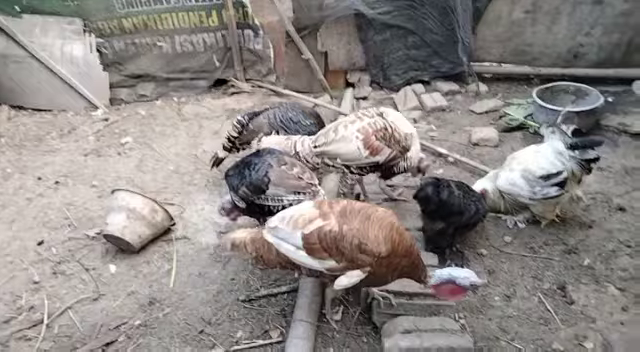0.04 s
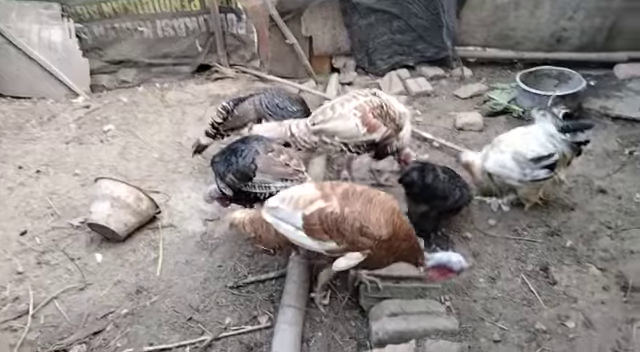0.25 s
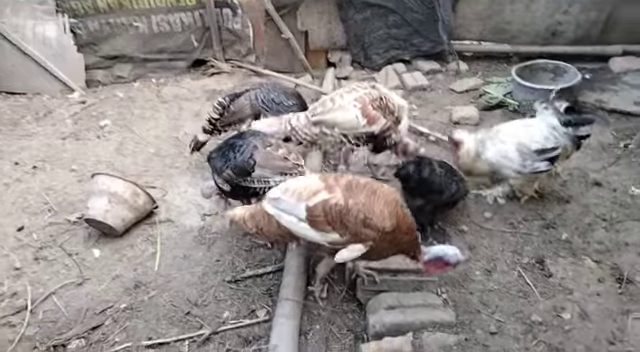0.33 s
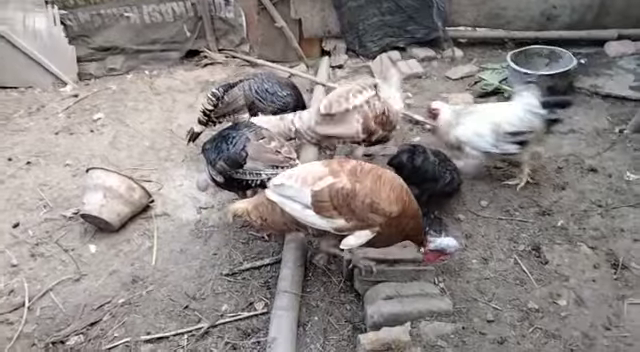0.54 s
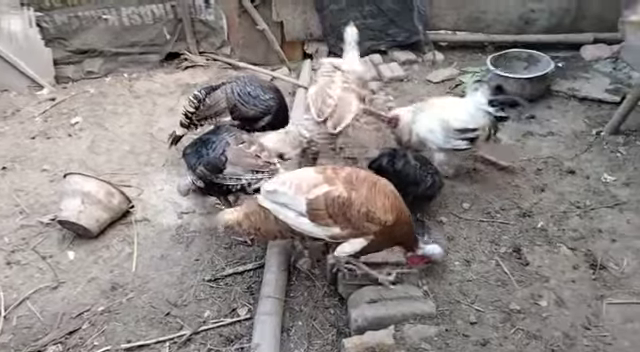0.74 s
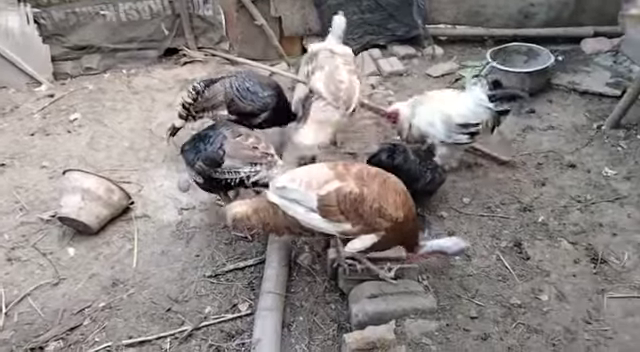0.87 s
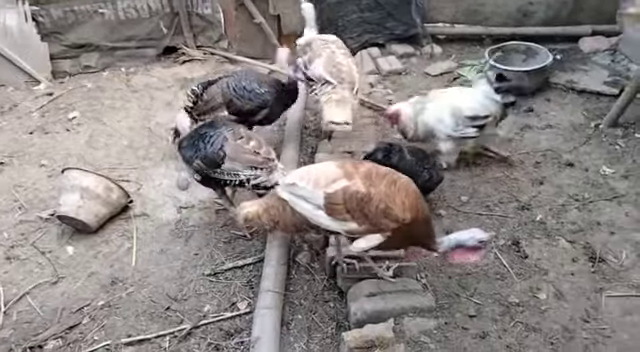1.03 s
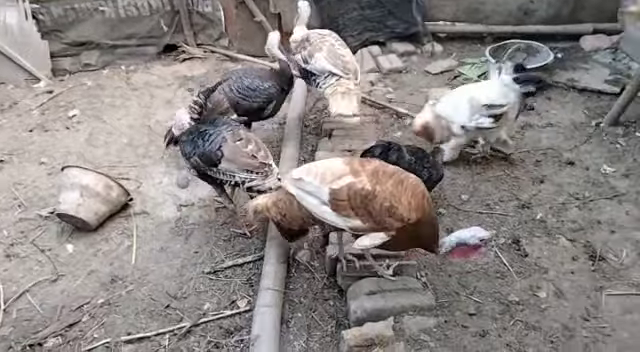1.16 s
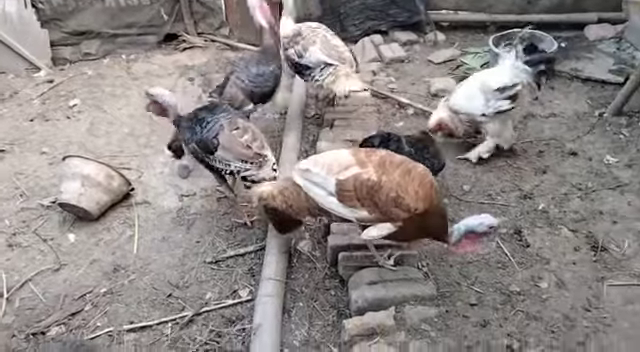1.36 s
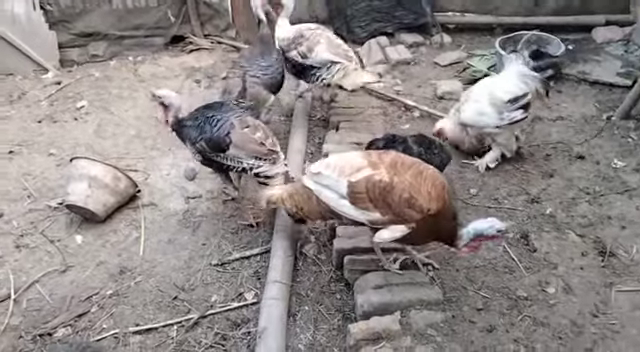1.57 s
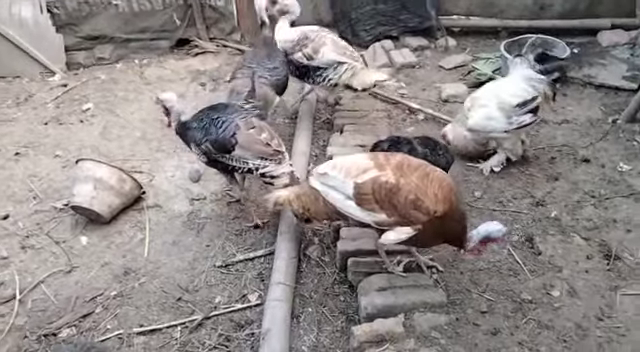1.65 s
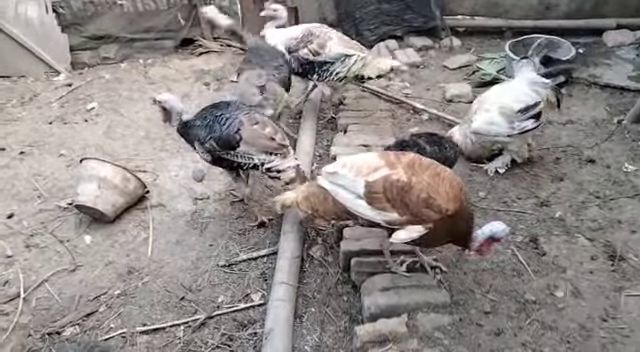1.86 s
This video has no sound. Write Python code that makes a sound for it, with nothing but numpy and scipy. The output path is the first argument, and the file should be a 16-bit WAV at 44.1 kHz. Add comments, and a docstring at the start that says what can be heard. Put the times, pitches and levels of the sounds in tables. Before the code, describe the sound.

Turkeys give a run of short, high yelps that mostly fall and crack, with one hoarse squawk overlapping the start. Light pecks, foot scuffs and soft hen clucks sit underneath, in a small, slightly echoing yard.

```python
"""Outdoor air and a low rumble fade in with three faint ticks; then turkeys call in a small walled yard.
One hoarse squawk, a stack of harmonics under a moving beak resonance, overlaps the first of a run of
yelps. Most yelps fall and crack at the end as the vocal membrane jitters and doubles its period.
Beaks peck, feet scuff dirt and knock on brick, and a hen clucks softly over a brief low drone.
Walls and sheds echo the birds."""
import sys
import numpy as np
from scipy import signal
from scipy.fft import rfft, irfft, next_fast_len
from scipy.io import wavfile
from scipy.ndimage import uniform_filter1d, map_coordinates

SR = 44100
rng = np.random.default_rng(int(sys.argv[2]) if len(sys.argv) > 2 else 0)


def transcribe(u):
    """Save the signal u as a 16-bit wav file named by the first command-line argument.

    u: samples, shape (n,) or (channels, n), limited to [-1, 1]; the rate is SR.
    q: integer samples, one column per channel.
    """
    v = np.clip(np.atleast_2d(u).T, -1, 1)
    q = np.round(v * 32767).astype(np.int16)
    wavfile.write(sys.argv[1], SR, q)


N = 83790


def amp(db):
    return 10 ** (np.asarray(db) / 20)


def unit_rms(x):
    return x / np.sqrt(np.mean(x ** 2) + 1e-20)


def clock():
    return np.arange(N) / SR


def along(points, hz):
    """Interpolate (f/Hz, value) points on a log frequency axis."""
    freqs, values = np.transpose(points)
    return np.interp(np.log(hz + 1), np.log(freqs + 1), values)


def curves(rows):
    """One per-sample curve for each column after t/s."""
    times, *columns = np.transpose(rows)
    return [np.interp(clock(), times, column) for column in columns]


def wobble(rate_hz):
    """Smooth random curve, rate_hz knots a second."""
    return map_coordinates(rng.standard_normal(N // 4), [clock() * rate_hz], mode="wrap")


def filtered(x, response):
    """Multiply the spectrum by response(hz)."""
    size = next_fast_len(N + SR // 2)
    return irfft(rfft(x, size) * response(np.fft.rfftfreq(size, 1 / SR)), size)[:N]


def noise(colour):
    """Coloured noise, rms 1."""
    return unit_rms(filtered(rng.standard_normal(N), lambda hz: amp(along(colour, hz))))


def gate(start_s, end_s, edge_s=0.0064):
    """Flat window with Gaussian edges."""
    outside_s = np.maximum(0, np.maximum(start_s - clock(), clock() - end_s))
    return np.exp(-(outside_s / edge_s) ** 2)


def arch(start_s, length_s):
    """Half-sine window."""
    return np.abs(np.sin(np.pi * np.clip((clock() - start_s) / length_s, 0, 1)))


def membrane_phase(hz, rough):
    """Phase of a vocal membrane; pitch jitter grows with roughness."""
    jitter = (0.008 + 0.037 * rough) * wobble(499.7)
    return 2 * np.pi * np.cumsum(hz * (1 + jitter)) / SR


def partial(phase, rough, rasp_hz=443):
    """Sine with a share of its power smeared into narrowband rasp."""
    share = np.clip(rough, 0, 1) ** 2
    rasp = wobble(rasp_hz) * np.sin(phase) + wobble(rasp_hz) * np.cos(phase)
    return np.sqrt(2 * (1 - share)) * np.sin(phase) + np.sqrt(share) * rasp


def bursts(rows, colour, t60_s, attack_s):
    """One decaying noise burst per (t/s, level/dB) row."""
    envelope = np.zeros(N)
    for start_s, db in rows:
        age_s = np.maximum(clock() - start_s, 0)
        envelope += amp(db - 60 * age_s / t60_s) * (1 - np.exp(-age_s / attack_s))
    return noise(colour) * envelope


# Air and rumble spectra: f/Hz, relative level/dB
AIR_COLOUR = [(130, 8), (220, 4), (330, 0.5), (460, 4), (650, -10.5), (1100, -12.5), (1600, -1),
              (2400, -19.5), (4000, -20), (6500, -25.5), (9200, -11.5), (11500, -21.5), (15000, -17.5)]
RUMBLE_COLOUR = [(20, -17), (45, 13.5), (70, 12.5), (95, 13), (130, -43), (250, -84)]


def air():
    """Outdoor air: broad noise with a slight flutter."""
    return noise(AIR_COLOUR) * amp(-62.5 + 0.75 * wobble(14))


def rumble(rise_s=0.31):
    """Low noise that swells in and stays."""
    rise = np.minimum(clock() / rise_s, 1) ** 3
    return noise(RUMBLE_COLOUR) * amp(-58 + wobble(5.3)) * rise


# Ticks: t/s, level/dB
TICK_HITS = [(.169, -60), (.229, -60), (.269, -55)]
# Tick spectrum: f/Hz, relative level/dB
TICK_SPECTRUM = [(100, -24), (300, 1), (1000, -8), (4000, -17.5), (15000, -28)]


def ticks():
    """Faint, dull ticks."""
    return bursts(TICK_HITS, TICK_SPECTRUM, t60_s=0.017, attack_s=0.0001)


# One contour per yelp: t/s, f/Hz, level/dB, half-pitch lines/dB, overtones/dB, roughness
YELP_CONTOURS = [
    [(.275, 1184, -60.5, -18, -8, 0.22), (.29, 1411, -48.5, -14, -5, 0.1),
     (.312, 1431, -43.5, -20, 8, 0.11), (.329, 1504, -36.5, -27, 2, 0.18)],
    [(.475, 1800, -48, 13.5, 7, 0.51), (.497, 1961, -37, 4.5, 1.5, 0.16), (.522, 2047, -38.5, 9.5, 5, 0.27),
     (.533, 1947, -38.5, 12, 3, 0.51), (.539, 1539, -35.5, 10.5, -2.5, 0.43),
     (.565, 1365, -46, 3, -4, 0.56)],
    [(.698, 1843, -58.5, -27, 2, 0.08), (.711, 2082, -50.5, 8, 6, 0.22), (.724, 1848, -43, 7, -3.5, 0.13),
     (.742, 1893, -41.5, 6.5, 3, .25), (.751, 1970, -39, 1, -1.5, 0.37), (.764, 1803, -45, -8, 8.5, 0.22),
     (.785, 1635, -42, -27, 5, 0.5), (.812, 1546, -50.5, 2.5, 6, 0.66)],
    [(.932, 1724, -58.5, 15, -2.5, 0.39), (.948, 1900, -37.5, -29, 0.5, 0.45),
     (.961, 1627, -32.5, -6, -6, .12), (.987, 1580, -33.5, -12.5, -4, 0.11),
     (.998, 1467, -34.5, 5, -6, 0.14), (1.01, 1471, -61.5, 13.5, 4.5, 0.46),
     (1.045, 1248, -48.5, 10.5, -6.5, 1.05)],
    [(1.224, 1906, -58, -21, -28, 0.19), (1.243, 1878, -43, -28, -5.5, 0.34),
     (1.26, 1677, -41.5, -16, -4, 0.02), (1.274, 1628, -52, -16, 11.5, 0.11),
     (1.286, 1770, -45.5, -27, -1.5, 0.3), (1.308, 1736, -39.5, -9, 0, 0.17),
     (1.326, 1709, -40, -22, -1, 0.14), (1.346, 1513, -44, -2, 5, 0.66), (1.372, 1484, -52.5, 14, 0, 0.83)],
    [(1.364, 948, -49.5, -10, -11, 0.77), (1.385, 698, -57, -16, 12, 0.8)],
    [(1.541, 1664, -57.5, -10, 10, 0.28), (1.552, 1676, -45.5, 0, 4, 0.25), (1.572, 1638, -40, 3, 0, 0.11),
     (1.594, 1717, -34.5, -10.5, -2.5, 0.11), (1.617, 1650, -35, 2, 4, 0.25),
     (1.631, 1500, -35.5, -31, 1.5, 0.44), (1.644, 1326, -41, 14, -5.5, 0.28),
     (1.66, 1126, -55, -11, -18, 1.2), (1.68, 1054, -44, -18, -34, 0.1), (1.705, 985, -68, -15, -16, 0.5)],
    [(1.884, 1450, -91, -13, -11, 0.07), (1.895, 1639, -49, 18, -12.5, 0.31),
     (1.91, 1790, -34, -15, -16, 0.26)],
]
# Throat response: f/Hz, gain/dB
YELP_FORMANTS = [(500, -28), (830, -24.5), (1100, -23), (2520, -21), (3000, -28), (3600, -17.5),
                 (4300, -28), (5050, -22.5), (6000, -28.5), (7100, -23), (8200, -27.5), (9300, -21),
                 (10800, -40.5), (15000, -47)]
CALL_TRIM_DB, LINE_SWING_DB = -1.5, 3


def yelp(contour):
    """Whistle with blurred overtones and breath; period doubling adds lines halfway between them."""
    hz, db, doubling_db, overtone_db, rough = curves(contour)
    phase = membrane_phase(hz, rough)
    breath = amp(-11) * rough * noise(YELP_FORMANTS) * (1 + np.cos(phase / 2))
    lines = np.zeros(N)
    for k in range(1, 19):
        if k != 2:  # k = 2 is the whistle
            line_db = along(YELP_FORMANTS, k * hz / 2) + doubling_db * (k % 2)
            line_db += LINE_SWING_DB * wobble(44.69)
            smear = 0.1 + 0.04 * k + 1.6 * rough
            lines += amp(line_db) * partial(k * phase / 2, smear)
    voice = partial(phase, rough) + amp(overtone_db) * (lines + breath)
    return voice * amp(CALL_TRIM_DB + db) * gate(contour[0][0], contour[-1][0])


# Squawk: t/s, f/Hz, level/dB, roughness
SQUAWK_CONTOUR = [(0.317, 711, -40, .15), (0.321, 713.4, -42, 0.28), (0.337, 683, -41.5, 0.46),
                  (.352, 685.5, -37.5, 0.17), (0.374, 701.8, -40.5, 0.13), (.39, 692.6, -39, 0.65),
                  (.407, 657.4, -35, 0), (.417, 712.7, -38.5, 0.47), (.446, 655, -37, 0.53),
                  (.478, 632.4, -45.5, 0.72), (.492, 629, -48, 0.35)]
# Throat response: f/Hz, gain/dB
SQUAWK_FORMANTS = [(300, -52), (670, -3), (1000, -52), (1400, 5), (2050, 3.5), (2750, -4), (3350, -6.5),
                   (3800, -15.5), (4800, -18), (6200, -13), (7600, -16), (9400, -7.5), (11000, -19.5),
                   (15000, -25)]
# Beak resonance: t/s, f/Hz
BEAK_RESONANCE = [(.32, 2220), (.345, 2650), (.407, 2630), (.45, 2310), (.48, 1870)]


def squawk(beak_gain_db=13.5, beak_width_hz=540):
    """Low register: hoarse harmonics under the moving beak resonance, with pulsing breath."""
    hz, db, rough = curves(SQUAWK_CONTOUR)
    beak_hz, = curves(BEAK_RESONANCE)
    phase = membrane_phase(hz, rough)
    voice = np.zeros(N)
    for k in range(1, 22):
        beak_db = beak_gain_db * np.exp(-((k * hz - beak_hz) / beak_width_hz) ** 2)
        line_db = along(SQUAWK_FORMANTS, k * hz) + beak_db + LINE_SWING_DB * wobble(69.33)
        voice += amp(line_db) * partial(k * phase, rough * (1 + 0.22 * k))
    voice /= np.sqrt(np.abs(uniform_filter1d(voice ** 2, size=700)))  # running rms to 1
    breath = amp(-1) * rough * noise(SQUAWK_FORMANTS) * (1 + np.cos(phase))
    window = gate(SQUAWK_CONTOUR[0][0], SQUAWK_CONTOUR[-1][0])
    return (voice + breath) * amp(CALL_TRIM_DB + db) * window


# Foot drags: t/s, length/s, level/dB before the fade-in
SCUFF_STROKES = [(0.545, 0.098, -60), (1.008, 0.23, -63), (1.302, 0.025, -66), (1.423, 0.047, -58.5)]
# Grit spectrum: f/Hz, relative level/dB
GRIT_SPECTRUM = [(300, -12), (800, 6.5), (1400, 9), (2500, 3.5), (4000, 3.5), (7000, -1), (9200, 11),
                 (11000, -0.5), (15000, 2)]


def scuffs(grains_per_s=98, grain_decay_s=0.015):
    """Feet drag through grit; loose grains tick throughout."""
    strokes = sum(amp(db) * arch(start_s, length_s) for start_s, length_s, db in SCUFF_STROKES)
    strokes *= amp(3.5 * wobble(600))
    grain_db = -77.5 + 3.5 * np.minimum(rng.exponential(size=N), 3)
    impacts = amp(grain_db) * (rng.random(N) < grains_per_s / SR)
    grains = signal.lfilter([1], [1, -np.exp(-1 / (grain_decay_s * SR))], impacts)
    return (strokes + grains) * noise(GRIT_SPECTRUM)


# Beak strikes: t/s, level/dB
PECK_HITS = [(.6666, -49.5), (.724, -43.5), (.8906, -51), (1.0617, -44.5), (1.1774, -50), (1.2313, -50.5),
             (1.6084, -31.5), (1.6135, -37), (1.7601, -44.5), (1.765, -45)]
# Peck spectrum: f/Hz, relative level/dB
PECK_SPECTRUM = [(500, -18), (2000, -1.5), (3500, -4), (5500, 3.5), (7500, 0), (9200, 10), (11000, -0.5),
                 (15000, -5)]


def pecks():
    """Beaks hit packed earth: sharp contacts with no ring."""
    return bursts(PECK_HITS, PECK_SPECTRUM, t60_s=0.017, attack_s=0.0003)


def drone(pitch_hz=83, start_s=0.815, end_s=1.06):
    """A brief, low, wavering tone."""
    hz = pitch_hz * (1 + 0.11 * wobble(34.45))
    phase = 2 * np.pi * np.cumsum(hz) / SR
    return amp(-55.5) * partial(phase, rough=0) * gate(start_s, end_s)


# Clucks: t/s, length/s, f/Hz, level/dB
HEN_CLUCKS = [(0.836, 0.05, 210.6, -60), (.928, 0.061, 222, -55.5)]
# Throat response: f/Hz, relative gain/dB
HEN_FORMANTS = [(220, -1), (440, 4.5), (660, -8), (880, 0), (1300, -19)]


def hen(pitch_arch=0.029):
    """Low closed-beak clucks; pitch and level arch with effort."""
    out = np.zeros(N)
    for start_s, length_s, hz, db in HEN_CLUCKS:
        effort = arch(start_s, length_s)
        phase = membrane_phase(hz * (1 + pitch_arch * (effort - 1)), rough=0.57)
        voice = sum(amp(along(HEN_FORMANTS, k * hz)) * np.sin(k * phase) for k in range(1, 7))
        out += amp(db) * np.sqrt(effort) * unit_rms(voice)
    return out


# Footfalls: t/s, ring f/Hz, knock level/dB, click level/dB
FOOTFALLS = [(.889, 595.5, -50.5, -52.5), (1.207, 856, -50, -71), (1.211, 523, -44, -69),
             (1.6446, 602, -45, -41.5), (1.647, 920, -49, -41.5), (1.762, 704, -50.5, -55)]
# Grit click spectrum: f/Hz, relative level/dB
CLICK_SPECTRUM = [(200, -4), (1100, 3.5), (2200, -4), (3300, 3), (4500, -13), (12000, -35)]


def steps(knock_t60_s=0.026, thud_hz=257, thud_t60_s=0.046):
    """Feet land on brick: a hollow knock, a lower thud and a click of grit."""
    clicks = [(start_s, click_db) for start_s, _, _, click_db in FOOTFALLS]
    out = bursts(clicks, CLICK_SPECTRUM, t60_s=0.018, attack_s=0.0004)
    for start_s, ring_hz, db, _ in FOOTFALLS:
        age_s = np.maximum(clock() - start_s, 0)
        knock = amp(-60 * age_s / knock_t60_s) * np.sin(2 * np.pi * ring_hz * age_s)
        thud = amp(-11 - 60 * age_s / thud_t60_s) * np.sin(2 * np.pi * thud_hz * age_s)
        out += amp(db) * (knock + thud)
    return out


# Shed reflections: delay/s, gain/dB
SHED_ECHOES = [(0.014, -17.5), (.026, -23.5)]


def shed_echoes(x):
    """First reflections off the sheds: delayed, weaker copies."""
    return filtered(x, lambda hz: sum(amp(db) * np.exp(-2j * np.pi * hz * s) for s, db in SHED_ECHOES))


# Yard decay: f/Hz, T60/s
YARD_DECAY = [(200, 0.48), (4000, 0.31), (10000, 0.39)]
# Reverb colour: f/Hz, relative gain/dB
YARD_RESPONSE = [(300, 10.5), (1600, 4.5), (3600, 7.5), (7000, 3.5), (14000, 4.5)]


def yard_reverb(x, build_s=0.0018):
    """Diffuse tail off walls and sheds; each frequency decays at its own rate."""
    hz, t, spectrum = signal.stft(rng.standard_normal(SR // 2), SR, nperseg=256)
    decay = amp(-60 * t / along(YARD_DECAY, hz)[:, None])
    _, tail = signal.istft(spectrum * decay, SR, nperseg=256)
    tail *= 1 - np.exp(-np.arange(len(tail)) / SR / build_s)
    wet = signal.fftconvolve(x, tail / np.linalg.norm(tail))[:N]
    return filtered(wet, lambda hz: amp(-12 + along(YARD_RESPONSE, hz)))


# Fade-in of air and scuffs: t/s, gain/dB
BACKGROUND_FADE = [(.05, -40.5), (.12, -14), (.28, -6.5), (.55, -2.5), (1.3, 2), (1.85, -1.5)]


def scene():
    """Birds, their echoes and the background, in mono."""
    calls = sum(yelp(contour) for contour in YELP_CONTOURS) + squawk() + hen()
    birds = calls + pecks() + steps()
    echoes = shed_echoes(calls) + yard_reverb(birds)
    fade_db, = curves(BACKGROUND_FADE)
    background = amp(fade_db) * (air() + scuffs()) + rumble() + ticks() + drone()
    return (birds + echoes + background)[None]


def record(dry, cutoff_hz=15750):
    """Brick-wall low-pass."""
    return filtered(dry[0], lambda hz: hz < cutoff_hz)[None]


dry = scene()
out = record(dry)
transcribe(out)
```